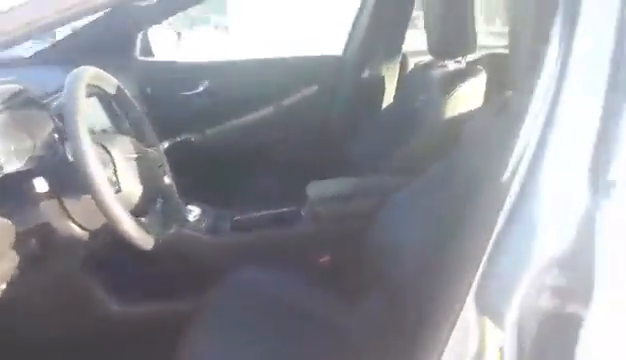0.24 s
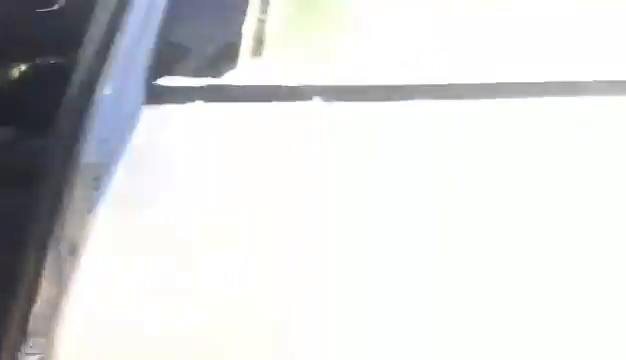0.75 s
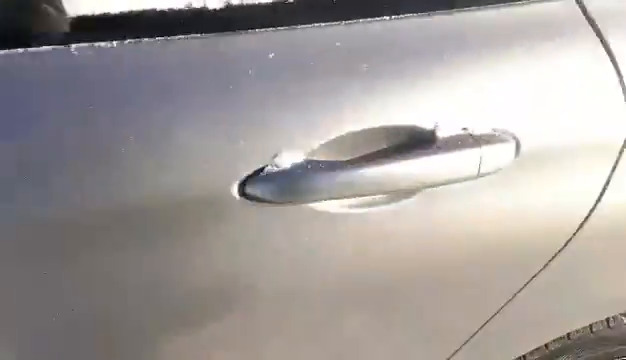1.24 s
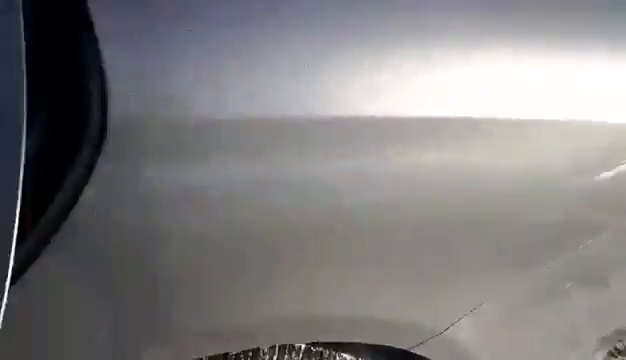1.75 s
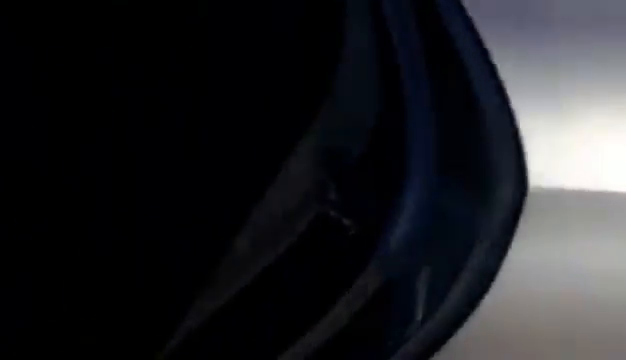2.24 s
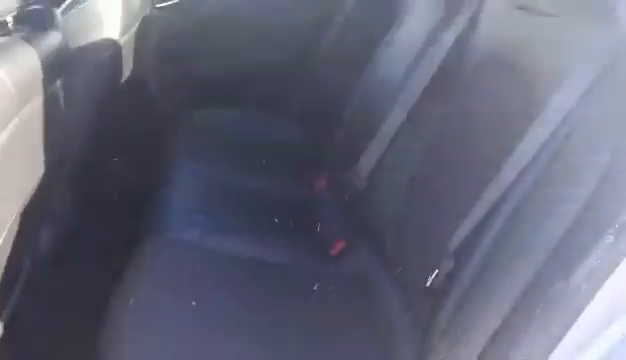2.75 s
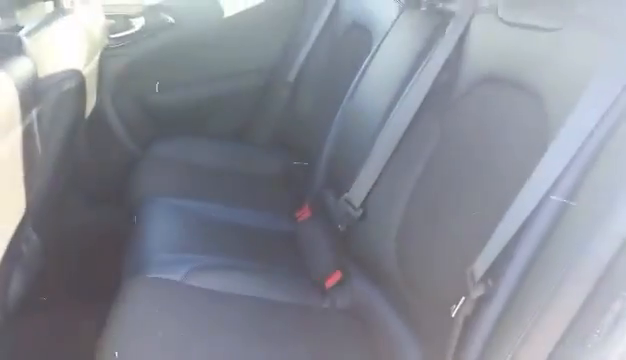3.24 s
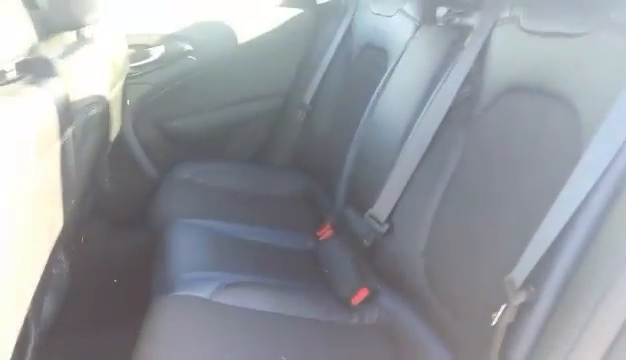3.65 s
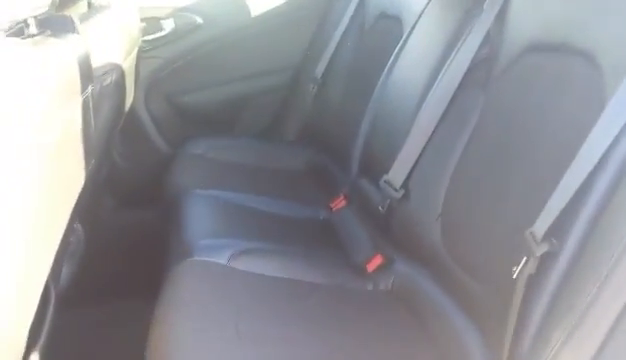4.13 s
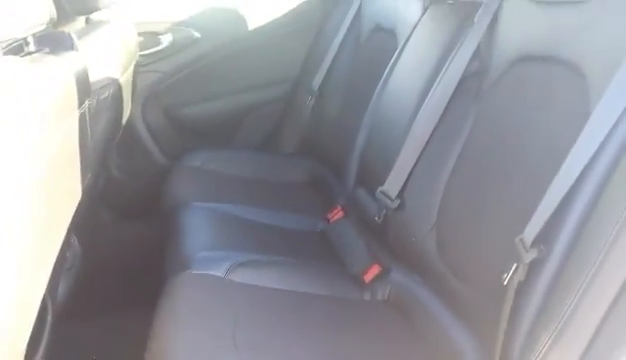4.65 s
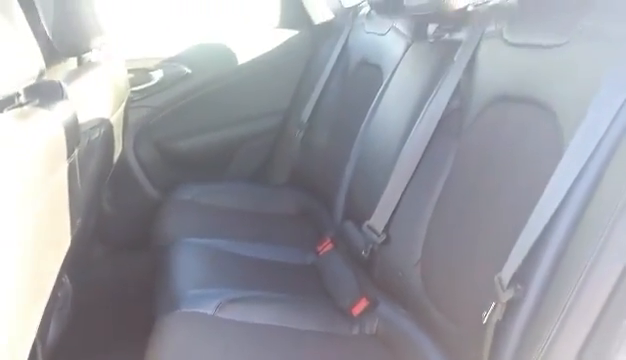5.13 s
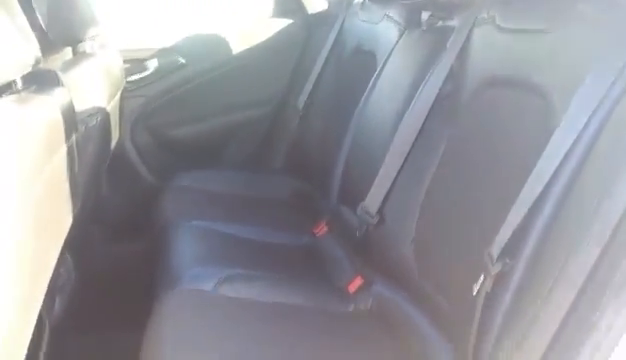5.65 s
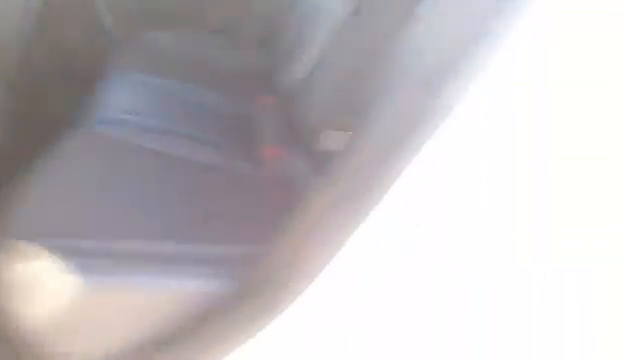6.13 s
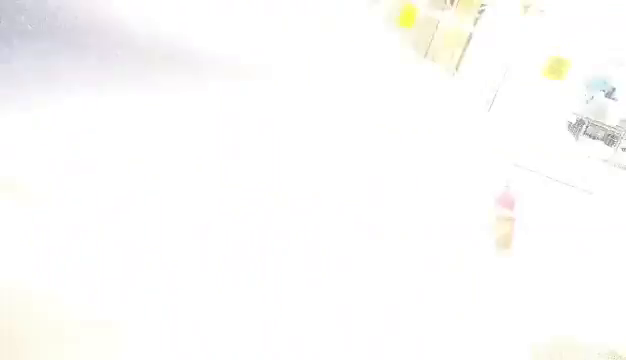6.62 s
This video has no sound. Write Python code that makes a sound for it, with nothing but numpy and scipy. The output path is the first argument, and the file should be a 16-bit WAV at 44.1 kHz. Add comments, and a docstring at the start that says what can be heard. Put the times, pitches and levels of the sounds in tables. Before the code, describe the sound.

A hand-held microphone bumps and rumbles beside an idling car. After a faint knock and short squeals, the front door slams hard. The rear handle clunks, its latch clacks and trim is briefly scraped. Inside, a steady droning engine hum strengthens for several seconds with a soft airy fan. Then loud sleeve rustle, muffled bumps and a heavy, chattering rear door slam end it.

```python
"""An idling car hums throughout: wavering engine and fan tones over coloured noise. A nylon sleeve swishes,
the grip on a hand-held camera rumbles and dull bumps jostle it. After a faint knock the front door squeals
into motion and slams: damped modes and noise cracks over cabin boom. The rear handle rattles, the latch
clacks open and plastic trim is scraped. Someone leans in, so the hum grows; a drone and a fan whir swell,
the hum falls away, and after more bumps and a knock the rear door slams, chatters and rebounds."""
import sys
import numpy as np
from scipy import signal
from scipy.fft import rfft, irfft, next_fast_len
from scipy.io import wavfile

SR = 44100
rng = np.random.default_rng(int(sys.argv[2]) if len(sys.argv) > 2 else 0)


def log_audio(samples):
    """Write samples as a 16-bit WAV file to the path given in sys.argv[1]."""
    # one column per channel
    frames = np.atleast_2d(samples).T
    # limit to full scale, then quantise
    limited = np.clip(frames, -1, 1)
    pcm = np.round(limited * 32767).astype(np.int16)
    wavfile.write(sys.argv[1], SR, pcm)


N = 303408  # length (samples)


def amp(db):
    """Linear gain of a level in dB."""
    return 10 ** (np.asarray(db) / 20)


def evened(x):
    """Scale x to an rms of one."""
    return x / np.sqrt(np.mean(x ** 2) + 1e-20)


def read(points, hz):
    """Read a curve at the frequencies hz, straight between its points on a log axis."""
    point_hz, value = np.transpose(points)
    return np.interp(np.log(hz + 1), np.log(point_hz + 1), value)


def level(rows):
    """Gain at every sample, straight in dB between rows of (time_s, level_db)."""
    return amp(np.interp(np.arange(N) / SR, *np.transpose(rows)))


def add(mix, start_s, sound):
    """Lay a sound into the mix from start_s on, cut at the end."""
    part = mix[:, max(0, round(start_s * SR)):][:, :sound.shape[-1]]
    part += sound[..., :part.shape[1]]


# every movement rises over this share of its length, then falls; roundness of its top
RISE_SHARE, SWELL_POWER = 0.35, 1.7


def swell(peak_s, length_s):
    """Bell of height 1: a quick rise, a slower fall; length_s spans its points at 37 % of the peak."""
    t = np.arange(N) / SR - peak_s
    side_s = length_s * np.where(t < 0, RISE_SHARE, 1 - RISE_SHARE)
    return np.exp(-np.minimum(abs(t) / side_s, 20) ** SWELL_POWER)


def swells(rows):
    """Gain at every sample from movements of (peak_s, level_db, length_s); their powers add."""
    return np.sqrt(sum((amp(db) * swell(peak_s, length_s)) ** 2 for peak_s, db, length_s in rows))


def drift(rate_hz):
    """Random wander of unit rms, mostly slower than rate_hz."""
    steps = np.arange(0, N + 32, 32)
    hz = np.fft.rfftfreq(len(steps), steps[1] / SR)
    spectrum = rfft(rng.standard_normal(len(steps))) / (1 + (hz / rate_hz) ** 4)
    wander = irfft(spectrum, len(steps))
    return np.interp(np.arange(N), steps, evened(wander))


# likeness of the noise at the left and right ports: pitch_hz, likeness (0 to 1)
PORT_LIKENESS = [(60, 0.97), (600, 1), (1000, 0.14), (1600, 0.083), (3000, 0.25), (8000, 0.06)]


def noise(colour, size):
    """Coloured noise at two ports, alike in the bass and nearly unrelated in the treble."""
    hz = np.fft.rfftfreq(size, 1 / SR)
    a, b = np.exp(2j * np.pi * rng.random((2, len(hz))))
    same = np.clip(read(PORT_LIKENESS, hz), 0, 1)
    ports = np.array([a, same * a + np.sqrt(1 - same ** 2) * b])
    return evened(irfft(ports * amp(read(colour, hz)), size))


def patchy(x, patchy_db, width_hz, length_s):
    """The colour shifts in drifting patches over time and frequency, with the gain kept at unit rms."""
    z = signal.stft(x, SR, nperseg=1024, noverlap=768)[2]
    across = signal.windows.gaussian(31, width_hz * 1024 / SR)
    along = signal.windows.gaussian(61, length_s * SR / 256)
    patches = signal.fftconvolve(rng.standard_normal(z.shape[1:]), np.outer(across, along), "same")
    gain = evened(amp(patchy_db * evened(patches)))
    return signal.istft(z * gain, SR, nperseg=1024, noverlap=768)[1][:, :x.shape[1]]


def die_away(x, t60s, stretch=1):
    """Each band of x fades at its own speed, its t60 multiplied by stretch."""
    hz, t, z = signal.stft(x, SR, nperseg=256)
    fade = amp(-60 * t / (stretch * read(t60s, hz)[:, None]))
    return signal.istft(z * fade, SR, nperseg=256)[1][:, :x.shape[1]]


# how long a crowd of modes dies, before each burst's stretch: pitch_hz, t60_s
BURST_FADE = [(100, 0.45), (300, 0.38), (700, 0.25), (2000, 0.17), (5000, 0.13), (12000, 0.11)]


def burst(colour, stretch, rise_s):
    """A crowd of modes struck at once: fading noise at unit rms over its first 20 ms."""
    x = die_away(noise(colour, size=SR // 3), BURST_FADE, stretch)
    x *= 1 - np.exp(-np.arange(x.shape[1]) / SR / rise_s)
    return x / np.sqrt(np.mean(x[:, :SR // 50] ** 2))


def ring(modes, stretch, rise_s, pitch=1, power=1, spot_db=0):
    """Damped sines of one struck object; neighbours swing in opposite senses, spot_db scatters their levels."""
    t = np.arange(SR // 2) / SR
    spots = spot_db * rng.standard_normal(len(modes))
    sines = np.zeros(len(t))
    for k, (hz, db, t60) in enumerate(modes):
        fade_db = 60 * (t / (t60 * stretch)) ** power
        sines += (-1) ** k * amp(db + spots[k] - fade_db) * np.sin(2 * np.pi * hz * pitch * t)
    return sines * (1 - np.exp(-t / rise_s))


FIRING_HZ, FAN_HZ = 56.41, 272.8  # centres of the wandering pitches
DRONE_HZ = 349
WASH_DB, WHIR_DB = -40, -54  # wash and whir at the hum's rms nearness; the whir gains 3 dB more
WASH_FOLLOW, WHIR_FOLLOW = 0.11, 0.051  # shares of the hum's change in dB that they follow
# engine tones: multiple of the firing rate, relative level_db
ENGINE_ORDERS = [(1, -11.5), (2, -9), (3, -20.5), (3.498, -18), (5, 1.5)]
# nearness of the hum: time_s, relative level_db
HUM_NEARNESS = [(0, -70), (.8, -49), (1, -41.5), (2.25, -48), (2.85, -39), (4.2, -33.5), (6.12, -31),
                (6.4, -48.5)]
# colour of the engine and fan wash: pitch_hz, relative density_db (per Hz)
WASH_COLOUR = [(20, -26), (45, -11.5), (100, -3.5), (200, -13), (290, -8.5), (340, -9.5), (456, -26.5),
               (900, -35), (1520, -52.5), (2780, -48), (13000, -54.5)]
# colour of the fan's whir: pitch_hz, relative density_db (per Hz)
FAN_COLOUR = [(200, -10.5), (700, 2.5), (1100, -3.5), (1550, 2.5), (2000, -3), (2700, -14.5), (5000, -18),
              (13000, -41)]
# the higher cabin note swells once: peak_s, level_db, length_s
DRONE_SWELLS = [(5.4, -32, 0.47)]
# the fan's whir swells once: peak_s, relative level_db, length_s
WHIR_SWELLS = [(5.83, -49.5, 0.51)]
# the background dips briefly: lowest_s, depth_db, length_s
BACKGROUND_DIPS = [(0.146, -11.5, 0.11), (0.828, -9.5, 0.086), (1.994, -13, 0.15)]


def engine():
    """Idle tones boom in the cabin; a fan tone just under the strongest one beats against it."""
    turns = np.cumsum(FIRING_HZ * (1 + 0.0012 * drift(rate_hz=10.1))) / SR
    tones = sum(amp(db + 3.1 * drift(rate_hz=29)) * np.sin(2 * np.pi * k * turns)
                for k, db in ENGINE_ORDERS)
    fan_turns = np.cumsum(FAN_HZ * (1 + 0.0052 * drift(rate_hz=4.96))) / SR
    fan = amp(-3.5 + 0.4 * drift(rate_hz=3.9)) * np.sin(2 * np.pi * fan_turns)
    hum = amp(3.5) * level(HUM_NEARNESS) * (tones + fan)

    drone_turns = np.cumsum(DRONE_HZ * (1 + 0.0118 * drift(rate_hz=16.0))) / SR
    drone = swells(DRONE_SWELLS) * np.sin(2 * np.pi * drone_turns)

    nearness = evened(level(HUM_NEARNESS))
    wash_gain = amp(WASH_DB) * nearness ** WASH_FOLLOW * amp(1.9 * drift(rate_hz=60))
    wash = wash_gain * noise(WASH_COLOUR, size=N)
    whir_gain = amp(3) * (amp(WHIR_DB) * nearness ** WHIR_FOLLOW + swells(WHIR_SWELLS))
    whir = whir_gain * patchy(noise(FAN_COLOUR, size=N), patchy_db=3, width_hz=80, length_s=.05)

    dips = amp(sum(db * swell(lowest_s, length_s) for lowest_s, db, length_s in BACKGROUND_DIPS))
    return dips * (hum + drone + wash + whir)


# colour of rubbed nylon, also of the tick: pitch_hz, relative density_db (per Hz)
NYLON_COLOUR = [(400, -5), (900, 1), (1500, -6.5), (3300, -4.5), (5200, -2), (7500, -7.5), (10000, -9),
                (12000, -13.5), (13500, -23)]
# strokes of the sleeve: fastest_s, relative level_db, length_s
SLEEVE_STROKES = [(.01, -61, 0.29), (.47, -50, 0.38), (.95, -61, 0.44), (1.41, -50, 0.38),
                  (1.56, -55, 0.078), (1.79, -60, 0.16), (2.2, -56.5, 0.3), (2.45, -51, 0.25),
                  (2.462, -45.5, 0.038), (2.71, -57, 0.085), (2.93, -60.5, 0.39), (6.07, -50.5, 0.25),
                  (6.22, -49, 0.23), (6.45, -41, 0.15), (6.8, -58.5, 0.26)]


def sleeve():
    """Nylon slides on nylon in tiny catches; the folds keep changing its colour."""
    catches = amp(1.1 * drift(rate_hz=160) + .8 * drift(rate_hz=25))
    swish = patchy(noise(NYLON_COLOUR, size=N), patchy_db=3.5, width_hz=60, length_s=.018)
    return amp(11.0) * swells(SLEEVE_STROKES) * catches * swish


# colour of handling the camera, also of a bump's scuff: pitch_hz, relative density_db (per Hz)
HANDLING_COLOUR = [(30, 0.5), (90, 3), (190, -3.5), (350, -14.5), (700, -28.5), (1500, -32.5), (8000, -48)]
# shifts of the grip: strongest_s, level_db (at the left port), length_s
GRIP_SHIFTS = [(.01, -27.5, 0.043), (.36, -30.5, 0.41), (5.9, -37.5, 0.52), (6.56, -20.5, 0.55)]


def rumble():
    """The grip shifts on the camera: a dull rumble, stronger at the left port and unrelated between the two."""
    left = noise(HANDLING_COLOUR, size=N)[0]
    right = amp(-7.5) * noise(HANDLING_COLOUR, size=N)[0]
    return swells(GRIP_SHIFTS) * np.array([left, right])


SCUFF_DB = -9.5  # a bump's scuff relative to its swing
# soft knocks and steps that jostle the camera: start_s, level_db (before the port balance), pitch_hz
CAMERA_BUMPS = [(.205, -21, 75), (.243, -15.5, 125), (.353, -15.5, 100), (.425, -17.5, 100),
                (.488, -15.5, 85), (.908, -20, 170), (.922, -15, 95), (1.772, -23, 85), (6.341, -16, 60),
                (6.459, -20, 80), (6.495, -12, 75), (6.541, -17, 95), (6.605, -14, 85)]
# small ticks of cloth and trim: start_s, level_db
CLOTH_TICKS = [(5.942, -33.5)]


def jostles():
    """Each bump is a few dull swings with a short scuff, mostly at the left port; a tick is dry and bright."""
    out, t = np.zeros((2, N)), np.arange(SR // 4) / SR
    sides = amp([[3], [-6]])  # left and right ports (dB)
    for start_s, db, hz in CAMERA_BUMPS:
        age = t * hz / 0.52
        swing = age * np.exp(1 - age) * np.sin(2 * np.pi * hz * t)
        add(out, start_s, sides * amp(db) * swing)
        scuff = burst(HANDLING_COLOUR, stretch=0.64, rise_s=0.0037)
        add(out, start_s, sides * amp(db + SCUFF_DB) * scuff)
    for start_s, db in CLOTH_TICKS:
        add(out, start_s, amp(db) * burst(NYLON_COLOUR, stretch=0.41, rise_s=0.001))
    return out


CRACK_S = 0.0019  # time in which a crack fades to 37 %
PANEL_DB = -12  # shudder of the sheet panels relative to the struck part
SEAL_POWER = 1.9  # the seal damps harder with time: a boom's loss in dB grows with this power of time
# dense modes of the sheet panels: pitch_hz, relative density_db (per Hz)
PANEL_COLOUR = [(40, -38), (110, -3), (200, 2), (330, -1), (700, -7), (1000, -12.5), (1800, -24),
                (3500, -20), (12000, -68)]
# dense modes of the latch: pitch_hz, relative density_db (per Hz)
LATCH_COLOUR = [(400, -3.5), (700, 1), (1100, -3.5), (1800, 3), (2900, -8.5), (4200, -7), (6500, -10.5),
                (9500, -14.5), (13000, -25.5)]
# what booms, cabin air or a door's sheet skin, before each thump's factors:
# pitch_hz, relative level_db, t60_s
BOOMS = {"cabin": [(60.6, -1, 0.31), (72.8, -12.5, 0.35), (96, -10, 0.39)], "skin": [(140.9, -1, 0.27),
         (184.4, 1, 0.2), (214.1, 1, 0.23)]}
# low thumps as a door meets its seal, heaves and settles:
# start_s, relative level_db, length_factor, pitch_factor, what booms
DOOR_THUMPS = [(1.264, -3.5, 1, 0.97, "cabin"), (1.294, -11, 0.91, 1.02, "skin"),
               (1.619, -14.5, 0.28, 1.12, "cabin"), (1.635, -17.5, 0.32, 0.95, "skin"),
               (2.116, -26.5, 0.54, 1.25, "skin"), (6.7, -0.5, 0.34, 1.19, "cabin"),
               (6.728, -12.5, 0.75, 0.977, "skin"), (6.77, -13.5, 0.63, 0.93, "skin"),
               (6.777, -4.5, 0.78, 0.98, "cabin")]
# what rings, a door's steel frame (front, rear), its catch or striker, the handle or its housing,
# the latch pawl, plastic trim, before each blow's factors: pitch_hz, relative level_db, t60_s
PARTS = {"front": [(318.4, 0.5, 0.2), (475.5, -5.5, 0.16), (842, -7.5, 0.069), (6040, -9, 0.034)],
         "catch": [(1540, 0, .05), (1700, 0, .055), (2780, -4, .05), (3870, -10, .07)],
         "rear": [(389.7, -2.5, 0.19), (485, -2.5, 0.26), (602, 2, 0.098), (697, 1.5, 0.072),
         (817, -6.5, 0.15), (1226, -9, 0.22), (1880, -11, 0.07)], "striker": [(600, 0, .07), (880, -5, .05),
         (1170, -4, .06), (1600, -6, .08), (3750, -23, .2)], "handle": [(606, -5.5, 0.13),
         (704, 4.5, .085)], "housing": [(280, 0, .11), (540, -12, .06), (1220, -11, .045)],
         "pawl": [(906, -6, 0.04), (1320, 3, 0.04), (1630, 2, .035), (2960, 7.5, 0.036)],
         "trim": [(2000, -7, .018), (2550, -2, .02)]}
# hard contacts in time order: a faint early knock, the front slam, handle, latch, trim,
# another knock, the rear slam and its rebound:
# start_s, part_db, clatter_db, crack_db (all relative), length_factor, pitch_factor, what rings
DOOR_BLOWS = [(.302, -36.5, -62, -41, 0.56, 1.2, "rear"), (1.2544, -13, -21, -10, 0.55, 1, "front"),
              (1.2575, -7.5, -15.5, -9, 0.6, 1, "catch"), (1.271, -15, -27, -18, .7, 1.02, "front"),
              (1.2905, -11, -33, -18, 0.9, 1.03, "front"), (1.2985, -18, -32, -17, 1.3, 1.15, "front"),
              (1.601, -20, -33.5, -26.5, 1.1, 1, "handle"), (1.623, -8, -30.5, -29, 0.49, 1.09, "housing"),
              (1.675, -27, -58, -54, 0.47, 0.88, "handle"), (1.687, -13, -42, -46, 0.42, 1, "housing"),
              (2.0715, -34, -34, -29, .7, 1, "pawl"), (2.0816, -35, -37, -30, .6, 1.06, "pawl"),
              (2.0905, -18, -21.5, -6, 0.6, 1.15, "rear"), (2.4085, -22, -50, -38, 1, 1, "trim"),
              (6.605, -27, -46, -37, 0.24, 1, "rear"), (6.6916, -7, -14.5, -13, 0.65, 1, "striker"),
              (6.6985, -10, -14, -7, 0.5, 1.03, "striker"), (6.7146, -19, -20.5, -9, 0.83, 1, "rear"),
              (6.7352, -13.5, -20, -27, 0.77, 1.13, "rear"), (6.7555, -4.5, -15.5, -15, 1, 1.25, "striker"),
              (6.783, -21.5, -43, -36, 1.2, 1, "rear")]


def doors():
    """Each contact cracks, rings a part and shakes latch and panels; skin and cabin air boom behind."""
    body, clatter = np.zeros((2, 2, N))
    t = np.arange(SR // 30) / SR
    for start_s, db, stretch, pitch, part in DOOR_THUMPS:
        boom = ring(BOOMS[part], stretch, rise_s=0.0024, pitch=pitch, power=SEAL_POWER)
        add(body, start_s, amp(db) * boom)
    for start_s, part_db, clatter_db, crack_db, stretch, pitch, part in DOOR_BLOWS:
        struck = ring(PARTS[part], stretch, rise_s=0.00012, pitch=pitch, spot_db=2.5)
        add(body, start_s, amp(part_db) * struck)
        add(body, start_s, amp(part_db + PANEL_DB) * burst(PANEL_COLOUR, stretch, rise_s=0.0048))
        crack = noise(LATCH_COLOUR, size=len(t)) * np.exp(-t / CRACK_S)
        add(body, start_s, amp(crack_db) * crack)
        add(clatter, start_s, amp(clatter_db) * burst(LATCH_COLOUR, stretch, rise_s=0.0022))
    rattle = amp(2.5 * drift(rate_hz=200))
    return body + rattle * patchy(clatter, patchy_db=5, width_hz=70, length_s=.02)


SQUEAL_HZ, SQUEAL_SAG_HZ_PER_S = 1180, 120  # mean pitch at time zero, and how it sinks
# thin squeals as the front door starts to move: loudest_s, level_db (of the lower partial), length_s
DOOR_SQUEALS = [(.39, -37, 0.09), (.5, -37, 0.04), (.565, -36, 0.08)]


def squeak():
    """A thin squeal that sinks a little; a partial a fifth above comes and goes."""
    hz = SQUEAL_HZ - SQUEAL_SAG_HZ_PER_S * np.arange(N) / SR
    turns = np.cumsum(hz * (1 + .003 * drift(rate_hz=25))) / SR
    upper = amp(-7.0 + 3.3 * drift(rate_hz=12)) * np.sin(3 * np.pi * turns)
    return swells(DOOR_SQUEALS) * (np.sin(2 * np.pi * turns) + upper)


# colour of rubbed plastic trim: pitch_hz, relative density_db (per Hz)
TRIM_COLOUR = [(1000, -20), (1500, -5), (2800, 2), (3700, -9), (5500, -6), (12000, -34)]
# scrapes over the trim: strongest_s, relative level_db, length_s
TRIM_SCRAPES = [(2.406, -33, 0.048)]


def scrape():
    """Plastic trim is rubbed in quick, uneven slips."""
    slips = amp(4 * drift(rate_hz=220))
    return swells(TRIM_SCRAPES) * evened(slips) * noise(TRIM_COLOUR, size=N)


PORT_LAG_S = 0.00034  # the right port hears later


def right_port(x, colour):
    """Sound reaches the right port a little later, and shaded."""
    size = next_fast_len(N + SR // 4)
    hz = np.fft.rfftfreq(size, 1 / SR)
    lag = np.exp(-2j * np.pi * hz * PORT_LAG_S)
    right = irfft(rfft(x[1], size) * amp(read(colour, hz)) * lag, size)
    return np.array([x[0], right[:N]])


# shading of near sounds at the muffled right port: pitch_hz, gain_db
NEAR_SHADE = [(100, -1.5), (700, -2), (1300, 0.5), (2300, -3.5), (4000, -19.5), (7500, -17), (13000, -16)]


def scene():
    """Shade the near sounds strongly and the engine slightly at the right port; the grip acts on each port."""
    background = right_port(engine(), [(200, -0.89), (10000, -2.6)])  # pitch_hz, gain_db
    near = sleeve() + jostles() + doors() + squeak() + scrape()
    return background + right_port(near, NEAR_SHADE) + rumble()


LOW_CUT_HZ, EDGE_HZ = 21, 13100  # the microphone's bass roll-off; upper band limit


def record(dry):
    """The microphone sheds the deepest bass and rounds off the loudest swings; then the band limit."""
    ceiling = 1.0
    lean = signal.sosfilt(signal.butter(2, LOW_CUT_HZ, "highpass", fs=SR, output="sos"), dry)
    squashed = ceiling * np.tanh(lean / ceiling)
    band_limit = signal.firwin(401, EDGE_HZ, window=("kaiser", 9), fs=SR)
    return signal.oaconvolve(squashed, band_limit[None], "same")


dry = scene()
out = record(dry)
log_audio(out)
```